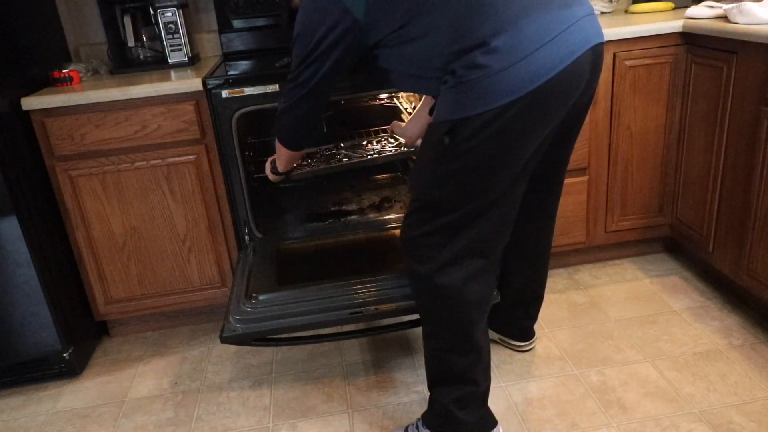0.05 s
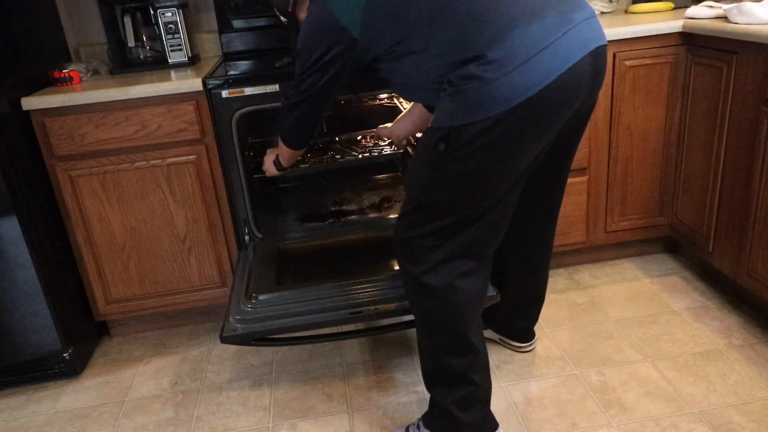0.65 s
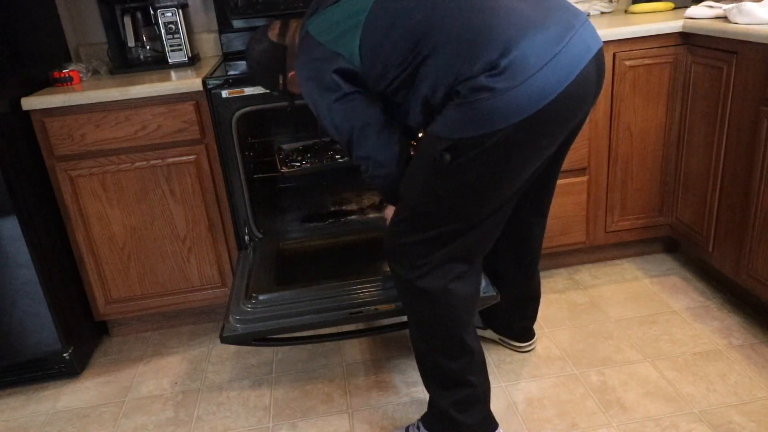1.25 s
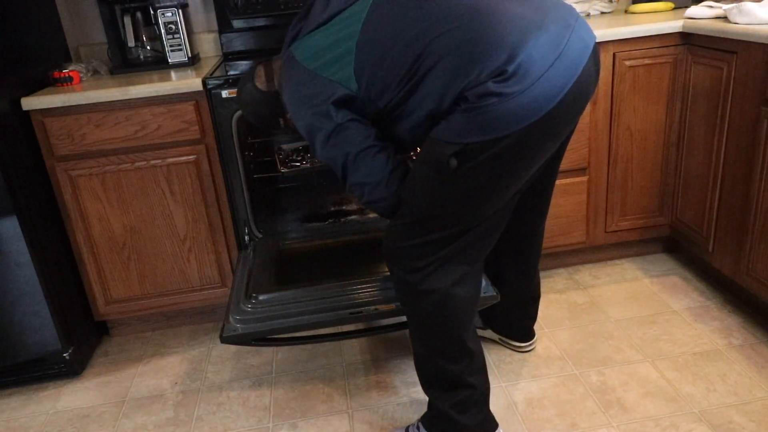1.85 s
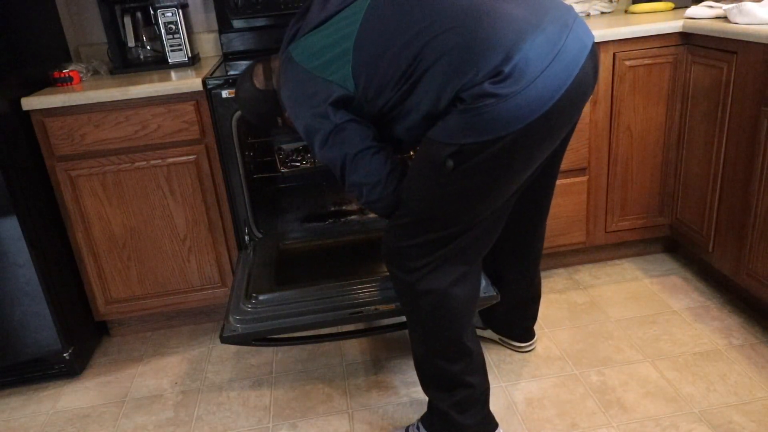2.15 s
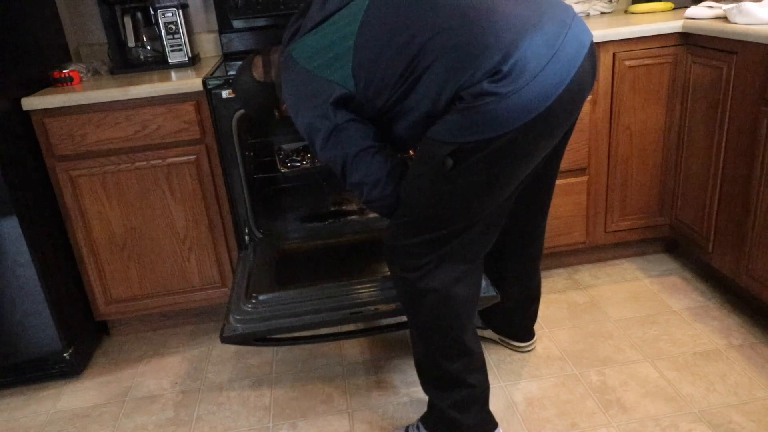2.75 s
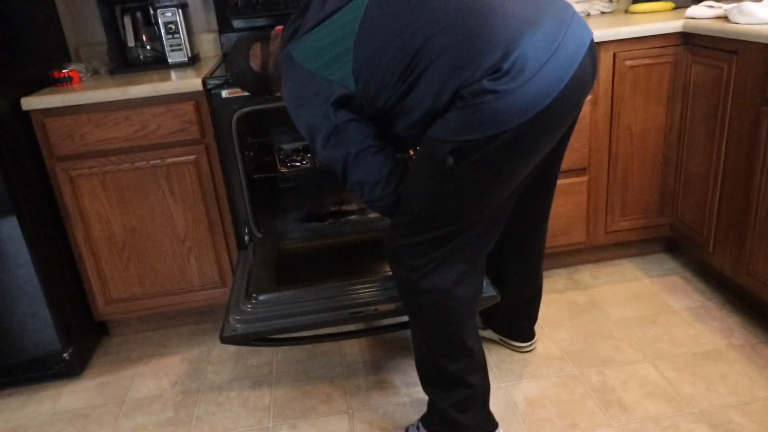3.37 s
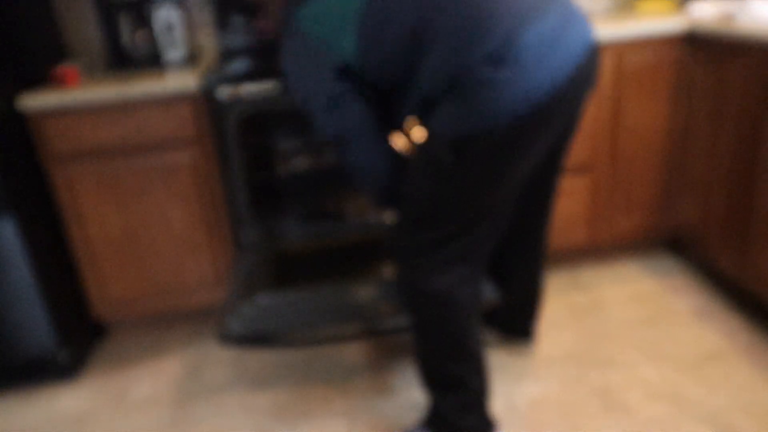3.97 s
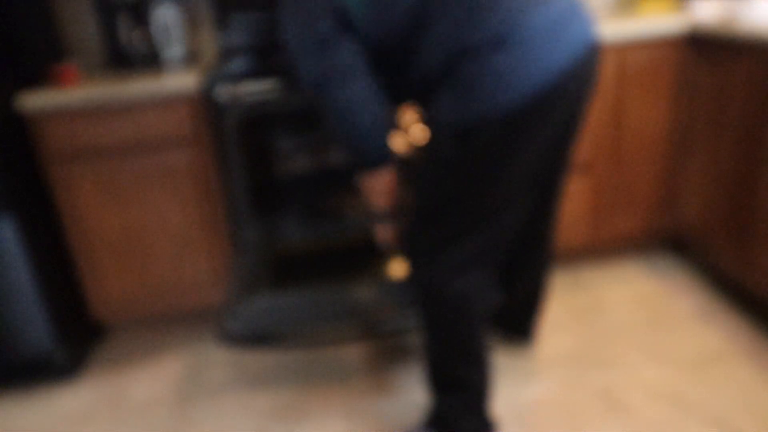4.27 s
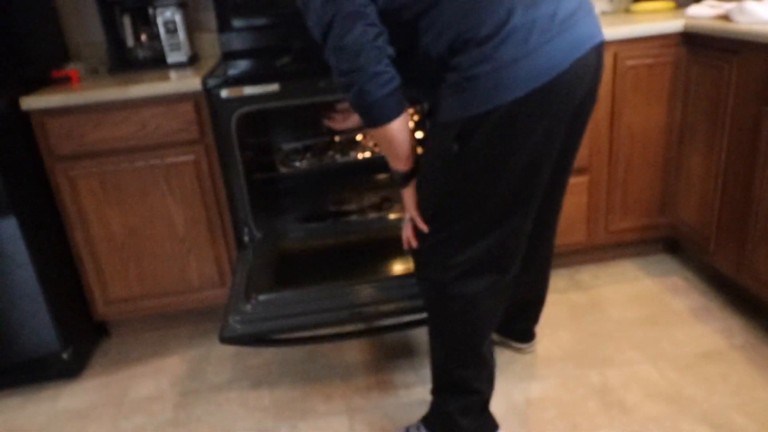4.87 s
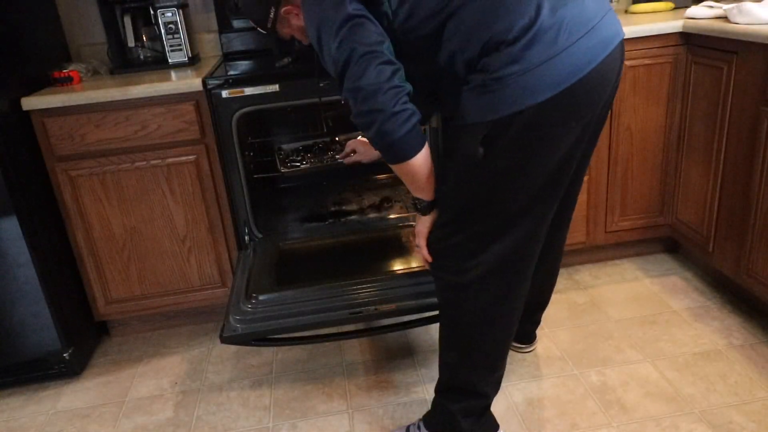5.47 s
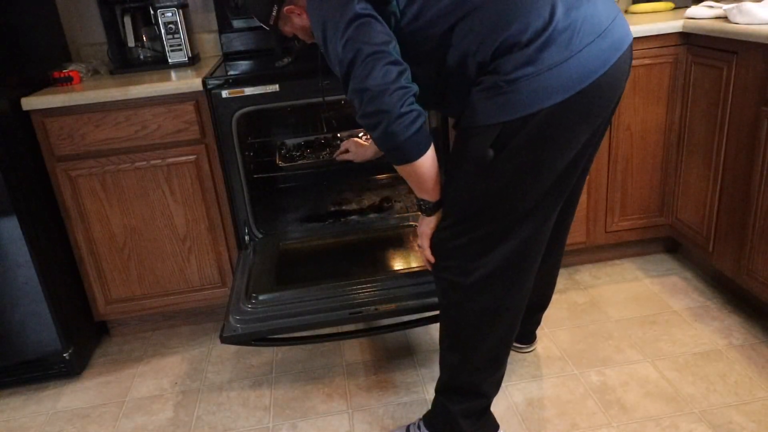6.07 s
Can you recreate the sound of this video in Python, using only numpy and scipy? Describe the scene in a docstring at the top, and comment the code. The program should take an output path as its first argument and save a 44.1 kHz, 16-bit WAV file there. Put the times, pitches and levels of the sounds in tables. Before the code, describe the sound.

A baking tray full of steel sockets and wrenches lands on an oven rack with loud, ringing clanks and a short scrape. The loose tools clink as they settle. The wire rack is then shoved several times, clunking in the hollow oven and springing back, before the tray slides with one more rattle. One nearby microphone picks up a small kitchen's short echo and faint hush.

```python
"""A small kitchen, one microphone within earshot of the oven, a faint hush behind everything.
First a baking tray of steel sockets and wrenches lands on the oven rack: it clanks, bounces and rings.
From about 1 s the loose tools clink as they settle. Between 2 and 5 s the rack is shoved again and again,
clunking in the oven's shell and springing back, while the floor gives a few soft bumps.
Near 6 s the tray is nudged along the wires and the tools rattle once more into the room's short echo."""
import sys
import numpy as np
from scipy import signal
from scipy.fft import rfft
from scipy.io import wavfile
from scipy.ndimage import uniform_filter1d

SR = 44100
rng = np.random.default_rng(int(sys.argv[2]) if len(sys.argv) > 2 else 0)


def int16_out(signal):
    """Quantize to a 16-bit WAV file."""
    q = np.round(np.clip(np.atleast_2d(signal).T, -1, 1) * 32767)
    wavfile.write(sys.argv[1], SR, q.astype(np.int16))


N = 274302
BINS = np.fft.rfftfreq(4096, 1 / SR)  # a colour is a gain in dB at each of these frequencies

# The colours of room tone, floor, sliding, tools, rack and tray. Each row: frequency in Hz, gain in dB.
ROOM_TONE_COLOUR = [(12, -49), (20, 2), (93, -11), (130, -9.5), (203, -12), (276, -6), (386, -9),
                    (432, -3.5), (525, -11), (587, -8), (820, -16.5), (892, -10.5), (1250, -16.5),
                    (13800, -26.5), (15800, -27.5)]
FLOOR_COLOUR = [(20, -5), (55, 2), (130, 1), (250, -17), (450, 5), (900, -20), (4000, -60)]
SLIDE_COLOUR = [(40, -28), (130, 3.5), (220, -15), (320, 8), (480, .5), (750, -7), (1200, -3.5),
                (1900, -4.5), (3200, -4.5), (6000, -12.5), (9000, -18), (12000, -28), (16000, -22)]
TOOL_COLOUR = [(100, -37), (350, -11), (750, -7.5), (1150, 0), (1600, 1), (2600, -2.5), (4000, -4.5),
               (6000, -10), (7000, -14), (8400, -13.5), (9800, -19), (11500, -23), (16000, -35)]
RACK_COLOUR = [(18, -36), (30, -8), (145, -5.5), (226, -4.5), (326, -9.5), (597, -4.5), (680, -9.5),
               (884, 1.5), (1030, -6.5), (1840, -10.5), (2800, -7), (3550, -14), (6840, -15.5), (9300, -19),
               (15800, -34)]
TRAY_COLOUR = [(24, -35), (40, -35), (123, -13.5), (236, -11.5), (612, -9.5), (711, -7.5), (984, -1),
               (1120, -5), (1930, -2), (3040, -5.5), (3710, -6.5), (8680, -17.5), (14000, -24.5),
               (15800, -34)]
# The kitchen's echo. Each row: frequency in Hz, seconds to fall 60 dB.
ROOM_DECAY = [(80, 0.81), (350, 0.7), (1200, 0.67), (3000, 0.55), (7000, 0.46), (14000, 0.23)]
# Humps and hollows of the oven's shell. Each row: centre in Hz, width in Hz, gain in dB.
OVEN_SHELL = [(66.4, 23, 2.5), (105, 11, -5.5), (149, 18, 4.5), (240.4, 37, -5.5), (318, 66, 8),
              (466, 42, 4), (612, 11, 7.5), (650, 31, -2.5), (924, 144, -5), (987, 66, -0.5),
              (1320, 69, 4.5), (1620, 29, 6.5), (2080, 54, 2.5), (2940, 39, 3), (4050, 180, 6.5),
              (4900, 86, 7.5), (5600, 160, 2.5), (6530, 100, 6.5)]
# The ringing modes of rack and tray. Each row: frequency in Hz, level in dB, seconds to fall 60 dB.
RACK_RESONANCES = [(134, 1.5, 1.23), (165, -35, .7), (314.2, 12.5, 0.7), (365, 4, 1.4), (402, 0, 0.65),
                   (598, 7, 0.7), (840, -11, 2.7), (1276, -13, 2.1), (1275, -5, 0.81), (2420, -4, 1.3),
                   (2870, -38, 2.1), (3180, -2, 0.71), (7650, -18, 0.63)]
TRAY_RESONANCES = [(53, -16.5, 2.5), (132, -6.5, 1.1), (336.3, -10, 5.5), (788, -2, .6), (887, -12.5, 2.5),
                   (919, 1, 1.1), (940, -10.5, 1.7), (950, -24, 0.37), (1067, 3.5, 0.21),
                   (1152, -3.5, 0.62), (1270, -8, 0.32), (1407, 0, 0.23), (1570, -15, .7), (1600, 2, 0.44),
                   (1760, -6, 2.1), (1794, 0.5, 0.78), (1910, 1.5, 0.29), (1960, -25, .7), (2160, -14, 1.4),
                   (2464, 9, 0.11), (2770, -5, .4), (3660, -4.5, 0.28), (4450, -15, 1.4), (6100, -22, 0.83),
                   (8470, -15, 0.54)]
# Weight shifts on the floor. Each row: start in seconds, level in dB.
FLOOR_BUMPS = [(1.141, -56), (1.813, -52), (3.828, -46.5), (4.409, -52)]
# The tray slides on the wires. Each row: start, fastest moment and end in seconds, level in dB.
TRAY_SLIDES = [(0.178, 0.381, 0.386, -29), (0.993, 1.044, 1.38, -40.5), (1.365, 1.42, 1.58, -39),
               (5.712, 5.927, 6.285, -31.5)]
# A socket rings freely. Each row: start in seconds, pitch in Hz, level in dB, seconds to fall 60 dB.
SOCKET_PINGS = [(0.01, 9100, -36, 0.25), (0.041, 6850, -39, 0.12), (0.07, 8470, -52, 0.99),
                (0.07, 6340, -48, 0.75), (1.071, 15400, -57, .14), (1.135, 7800, -60.5, 0.18),
                (1.243, 7850, -43, 0.1), (1.357, 7950, -30.5, 0.038), (1.357, 9000, -35, 0.07),
                (5.918, 15000, -61, .3), (5.962, 5180, -39.5, 0.07)]
# Tools knock together. Each row: time in seconds, level in dB, main resonance in Hz, treble in dB.
TOOL_CLINKS = [(0.966, -19, 1750, -13.5), (1.07, -28, 1960, -17), (1.239, -25.5, 1980, -11),
               (1.357, -18, 2200, -5), (1.444, -25.5, 1500, -23), (1.674, -28, 1480, -25),
               (1.95, -14.5, 2840, -11.5), (2.099, -23, 1330, -24), (5.688, -27, 2040, -22),
               (5.71, -21.5, 1720, -16), (5.755, -24, 2220, -18), (5.844, -28.5, 1470, -34),
               (5.935, -22, 1890, -21), (5.961, -28, 2550, -25), (6.075, -19, 2030, -23.5)]
# The rack hits its stop. Each row: time in seconds, level, boom and treble in dB, rattle in seconds.
RACK_SHOVES = [(1.802, -28.5, -23, -14, 0.027), (2.369, -17.3, -25, -13, 0.028),
               (3.06, -20.5, -3, -20, 0.044), (3.707, -16, -6, -15, 0.022), (4.338, -40.5, -20, -46, 0.025),
               (4.5, -17.5, -19, -11.5, .02), (5.007, -15, -20, -11.5, 0.042)]
# The rack springs back. Each row: time in seconds, level and treble in dB, rattle in seconds.
RACK_RECOILS = [(1.86, -33.5, -24, 0.0092), (2.457, -16, -7, 0.029), (3.165, -20, -10, 0.027),
                (3.942, -22.5, -7.5, 0.051), (4.615, -22.5, -8, 0.04), (5.034, -22, -7, 0.027)]
# It shudders, then drops into place.
# Each row, against the recoil: delay in seconds, level and treble in dB, factor on the rattle time.
RACK_SETTLING = [(.05, -5.5, -11, 1.31), (.235, -19.5, -18.5, 1.2)]
# The tray hits the rack. Each row: time in seconds, level, bass and treble in dB, rattle in seconds.
TRAY_STRIKES = [(0.001, -9, -8, -12, 0.031), (0.027, -9, -11, -14, 0.058), (0.06, -8.5, -20, -28, 0.033),
                (0.13, -12, -11.5, -30, 0.036), (0.389, -6.5, -26.5, -14.5, 0.015),
                (0.552, -14, -23, -12, 0.012), (0.565, -5.5, -23, -4, 0.025),
                (0.589, -11.5, -19, -29, 0.027)]


def amp(db):
    """Decibels to gain."""
    return 10 ** (np.asarray(db) / 20)


def unit_rms(x):
    """Scales to rms 1."""
    return x / np.sqrt(np.mean(x ** 2) + 1e-20)


def wander(size, smooth):
    """Noise of rms 1, averaged over `smooth` points."""
    return unit_rms(uniform_filter1d(rng.standard_normal(size), smooth))


def curve(points, hz=BINS):
    """Joins points by straight lines on a log-frequency axis."""
    knots, values = np.transpose(points)
    return np.interp(np.log(hz + 1), np.log(knots + 1), values)


def add(mix, s, sound):
    """Mixes a sound in at s seconds."""
    part = mix[max(round(s * SR), 0):][:len(sound)]
    part += sound[:len(part)]


def times(seconds):
    """A time axis."""
    return np.arange(int(seconds * SR)) / SR


def coloured(x, colour):
    """Gives x a colour through a minimum-phase filter."""
    log_gain = np.log(amp(np.r_[colour, colour[-2:0:-1]]))
    taps = np.fft.ifft(np.exp(np.conj(signal.hilbert(log_gain)))).real
    return signal.oaconvolve(x, taps[:len(BINS)])[:len(x)]


def hump(hz, width):
    """A bell curve of height 1 on BINS."""
    return np.exp(-.5 * ((BINS - hz) / width) ** 2)


def above(hz):
    """A smooth step from 0 below hz to 1 above it."""
    return BINS ** 4 / (BINS ** 4 + hz ** 4)


def contacts(size, per_s, spread_db):
    """Tiny collisions at random moments; spread_db makes them unequal in strength."""
    hits = rng.random(size) < per_s / SR
    weight = np.minimum(rng.exponential(1, size), 4)
    return hits * rng.choice([-1, 1], size) * amp(spread_db * weight)


def blow(rise_s, rattle_s, colour, per_s, spread_db):
    """A burst of collisions that swells and dies; its first 20 ms have rms 1."""
    t = times(.3)
    swell = (1 - np.exp(-t / rise_s)) ** 2 * np.exp(-t / max(rattle_s, 1e-3))
    burst = contacts(len(t), per_s, spread_db) * swell
    # the burst's own peaks are eased: most of the colour comes from the struck body
    power = uniform_filter1d(abs(rfft(burst, 16384)) ** 2, size=21)[::4]
    peaks_db = 10 * np.log10(abs(power) + 1e-9)
    # every blow lands on another spot, which stresses other short-lived resonances
    ripple_db = 2.7 * np.tanh(wander(len(BINS), 9)) * above(330)
    sound = coloured(burst, colour + ripple_db - .14 * peaks_db)
    return sound / np.sqrt(np.mean(sound[t < .02] ** 2) + 1e-20)


def ring(modes, blows, waver_hz, beat_db=4):
    """Modes gather energy from blows and lose it at their own rate; loose parts make them waver."""
    t, out = np.arange(N) / SR, np.zeros(N)
    coarse_t = np.arange(0, N + 128, 128) / SR
    starts, strength_db = np.transpose(blows)[:2, :, None]
    age = np.maximum(coarse_t - starts, 0)
    for hz, db, t60 in modes:
        energy = np.sum((age > 0) * amp(db + strength_db - 60 * age / t60) ** 2, 0)
        pitch = hz + waver_hz * wander(len(coarse_t), 10)
        beating = amp(beat_db * np.tanh(wander(len(coarse_t), 10)))
        phase = np.interp(t, coarse_t, 2 * np.pi * np.cumsum(pitch) * coarse_t[1])
        out += np.interp(t, coarse_t, np.sqrt(energy) * beating) * np.sin(phase)
    return out


def room_tone(level_db=-54):
    """The kitchen's steady hush at the microphone."""
    return amp(level_db) * unit_rms(coloured(rng.standard_normal(N), curve(ROOM_TONE_COLOUR)))


def floorboards():
    """Dull thuds reach the microphone through the floor as weight shifts on it."""
    out = np.zeros(N)
    for s, db in FLOOR_BUMPS:
        add(out, s, amp(db) * blow(.0036, .054, curve(FLOOR_COLOUR), per_s=5900, spread_db=-9))
    return out


def kitchen_echo(x, build_s=.0018, turn_s=.024, count=3):
    """Dense reflections come back off cabinets and floor; the treble dies first."""
    t, out = times(1.2), np.zeros(N)
    for k in range(count):
        reflections = rng.standard_normal(len(t)) * (1 - np.exp(-t / build_s))
        hz, age, spectrum = signal.stft(reflections, SR, nperseg=256)
        decay = amp(-60 * age / curve(ROOM_DECAY, hz)[:, None])
        tail = signal.istft(spectrum * decay, SR)[1]
        # the tails cross-fade in quick turns, keeping the echo smooth and free of stray tones
        share = np.sqrt(2 / count) * abs(np.sin(np.pi * (np.arange(N) / SR / turn_s + k / count)))
        out += signal.fftconvolve(x * share, tail / np.linalg.norm(tail))[:N]
    return out


def jingle(level_db=-27, fade_s=.03):
    """Each shove and recoil of the rack shakes single sharp ticks out of the loose tools."""
    t = np.arange(N) / SR
    jolts = RACK_SHOVES + RACK_RECOILS
    shake = sum((t > s) * amp(db) * np.exp(-abs(t - s) / fade_s) for s, db, *_ in jolts)
    ticks = coloured(contacts(N, per_s=120, spread_db=0), curve(TOOL_COLOUR) + 8 * above(4500))
    return amp(level_db) * shake * unit_rms(ticks)


def sliding(level_db=2, ends_db=-15.5):
    """Small slips of the tray on the wires keep the load jingling, loudest where it moves fastest."""
    t, speed = np.arange(N) / SR, np.zeros(N)
    for start, fastest, end, db in TRAY_SLIDES:
        swell_db = np.interp(t, [start, fastest, end], [ends_db, 0, ends_db])
        speed += (t > start) * (t < end) * amp(db + swell_db)
    colour = curve(SLIDE_COLOUR)
    slip = blow(.00071, .001, colour, per_s=15000, spread_db=2.5)
    grit = signal.oaconvolve(contacts(N, per_s=160, spread_db=1), slip)[:N]
    rub = coloured(contacts(N, per_s=1500, spread_db=0), colour)
    return amp(level_db) * speed * (.31 * unit_rms(grit) + .23 * unit_rms(rub))


def sockets(level_db=-5, split=.00442):
    """A socket rings like a tiny bell, on a close pair of modes, and chatters against its neighbours."""
    t, out = times(.6), np.zeros(N)
    for s, hz, db, t60 in SOCKET_PINGS:
        chatter = .7 * wander(len(t), 200)
        lower = np.sin(2 * np.pi * hz * t + chatter)
        upper = np.sin(2 * np.pi * hz * (1 + split) * t - chatter)
        add(out, s, amp(db + level_db - 60 * t / t60) * (lower + 4.3 * upper))
    return out


def tools(level_db=-12, graze_db=-17, rise_s=.0015):
    """Steel on steel: a light graze, then a short clack, damped by the pile, with one broad resonance."""
    out = np.zeros(N)
    for s, db, hz, treble_db in TOOL_CLINKS:
        resonance = 5 * hump(hz, .17 * hz) + 4 * hump(hz, 70)
        colour = curve(TOOL_COLOUR) + resonance + (treble_db + 19) * above(4100)
        graze = blow(.0016, .0077, colour - 10 * above(3500), per_s=5000, spread_db=7)
        add(out, s - .01, amp(min(db, -22) + graze_db + level_db) * graze)
        softness = amp(-.5 * min(db + 26, 0))  # light touches build up more slowly
        clack = blow(rise_s * softness, .011, colour, per_s=8000, spread_db=.5)
        add(out, s - rise_s, amp(db + level_db) * clack)
    return out


def clunks():
    """All the rack's knocks. Each row: time in seconds, level, boom, body, treble in dB, rattle time."""
    rows = [(s, db, boom, -14, treble, rattle_s) for s, db, boom, treble, rattle_s in RACK_SHOVES]
    for s, db, treble_db, rattle_s in RACK_RECOILS:
        rows.append((s, db, -23, -9, treble_db, rattle_s))  # little boom, more body
        for delay, drop_db, dull_db, stretch in RACK_SETTLING:
            rows.append((s + delay, db + drop_db, -20, -9, treble_db + dull_db, rattle_s * stretch))
    return rows


def rack(level_db=-10.5, drag_db=-16, rise_s=.0042):
    """The wire rack drags a little, then buzzes against its runners, and the hollow oven booms with it."""
    out = np.zeros(N)
    for s, db, boom_db, body_db, treble_db, rattle_s in clunks():
        # each knock catches the wires at another place, which moves the upper resonances
        shifts = 1 + .057 * rng.standard_normal(len(OVEN_SHELL))
        shell = sum(gain * hump(hz * (shift if hz > 1500 else 1), width)
                    for shift, (hz, width, gain) in zip(shifts, OVEN_SHELL))
        hollow = .5 * (boom_db + 16) * hump(185, 32) + .5 * (body_db + 16) * hump(400, 270)
        colour = curve(RACK_COLOUR) + shell + hollow + (treble_db + 15) * above(4300)
        drag = blow(.0042, .021, colour - 14 * above(1400), per_s=6500, spread_db=.5)
        add(out, s - .011, amp(db + drag_db + level_db) * drag)
        buzz = blow(rise_s, rattle_s, colour, per_s=5500, spread_db=2.5)
        add(out, s - rise_s, amp(db + level_db) * buzz)
    return out


def landings(gap_s=.05, shrink=.62):
    """Each strike and its two bounces, each sooner, softer and duller, in rows like TRAY_STRIKES."""
    rows = []
    for s, db, bass_db, treble_db, rattle_s in TRAY_STRIKES:
        rows.append((s, db, bass_db, treble_db, rattle_s))
        for k in (1, 2):
            s += gap_s * shrink ** (k - 1)
            rows.append((s, db - 9 * k, bass_db + 10 * k, treble_db - 5 * k, .016))
    return rows


def ringing(tray_db=-31, rack_db=-34, clink_share_db=-7):
    """The tray's sheet rings on after landings and clinks, the rack after its knocks."""
    on_sheet = [(s, db) for s, db, *_ in landings()]
    on_sheet += [(s, db + clink_share_db) for s, db, *_ in TOOL_CLINKS]
    sheet = ring(TRAY_RESONANCES, on_sheet, waver_hz=5.44)
    wires = ring(RACK_RESONANCES, clunks(), waver_hz=6.16)
    return amp(tray_db) * sheet + amp(rack_db) * wires


def tray(level_db=-12):
    """Each landing makes the load chatter on the sheet; the oven's shell colours the low end."""
    out = np.zeros(N)
    shell = .5 * sum(gain * hump(hz, width) for hz, width, gain in OVEN_SHELL) * (1 - above(990))
    for s, db, bass_db, treble_db, rattle_s in landings():
        bass = .63 * (bass_db + 22) * (1 - above(1350))
        treble = .75 * (treble_db + 17) * above(3530)
        colour = curve(TRAY_COLOUR) + bass + treble + shell
        clank = blow(.0005, rattle_s, colour, per_s=9000, spread_db=1.7)
        add(out, s - .002, amp(db + level_db) * clank)
    return out


def scene():
    """Clanks, clunks, rattles and pings arrive directly and as echo, over ringing, floor thuds and hush."""
    clanks, knocks = tray(), rack()
    rattles = tools() + sliding() + jingle()
    pings = sockets()
    echo = kitchen_echo(amp(-5.5) * clanks + amp(-4) * knocks + amp(-5) * rattles + amp(-6.5) * pings)
    direct = clanks + knocks + rattles + pings + ringing()
    return (direct + floorboards() + echo + room_tone())[None]


def record(dry, edge_hz=15950):
    """The microphone's single channel passes through the recorder's steep band limit."""
    lowpass = signal.firwin(511, edge_hz, window=("kaiser", 9), fs=SR)
    return signal.oaconvolve(dry, lowpass[None], "same")


dry = scene()
out = record(dry)
int16_out(out)
```